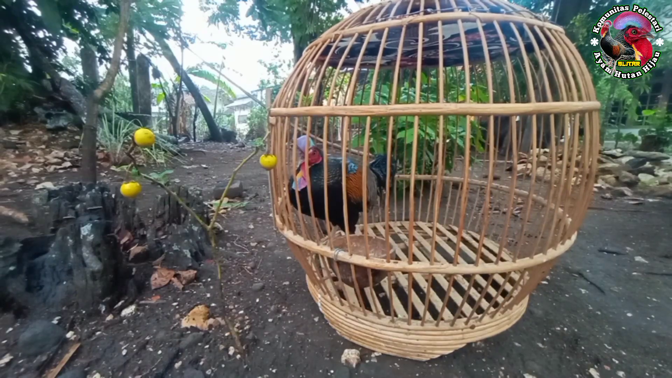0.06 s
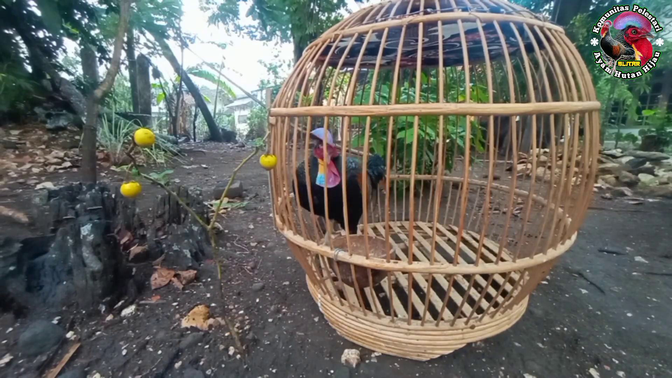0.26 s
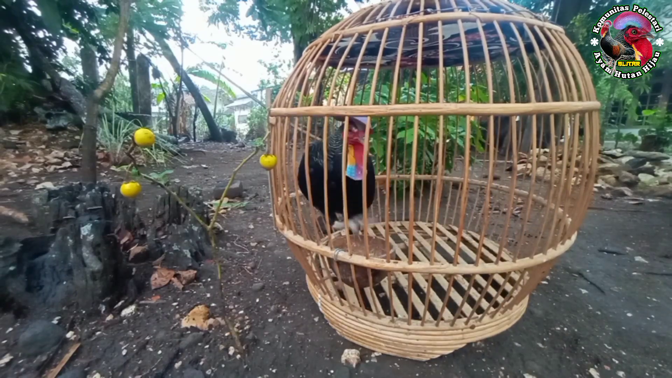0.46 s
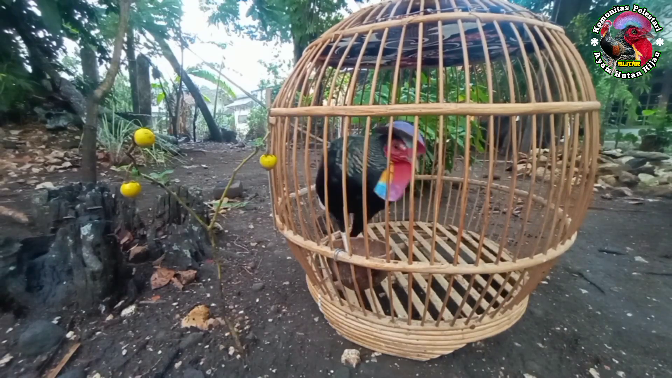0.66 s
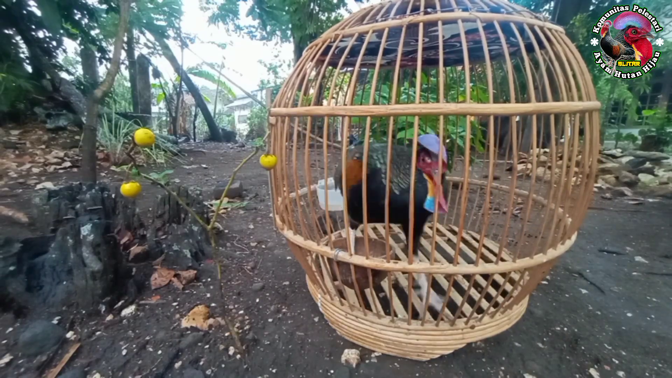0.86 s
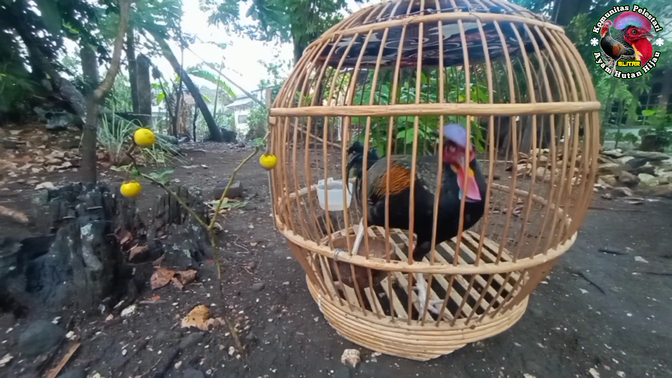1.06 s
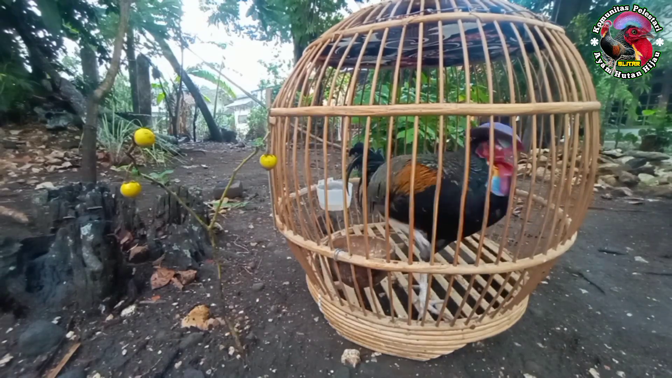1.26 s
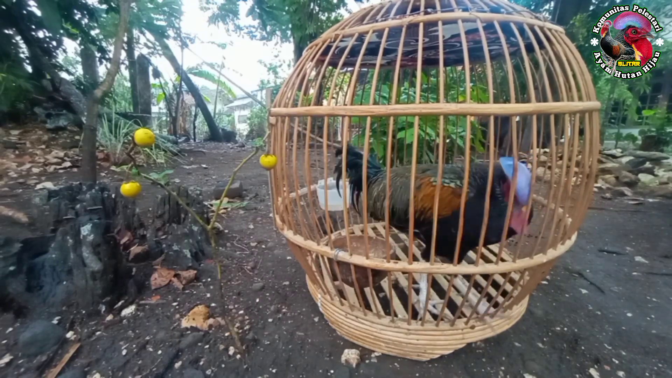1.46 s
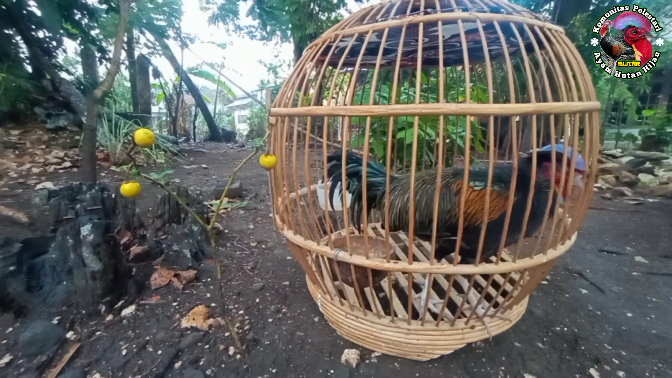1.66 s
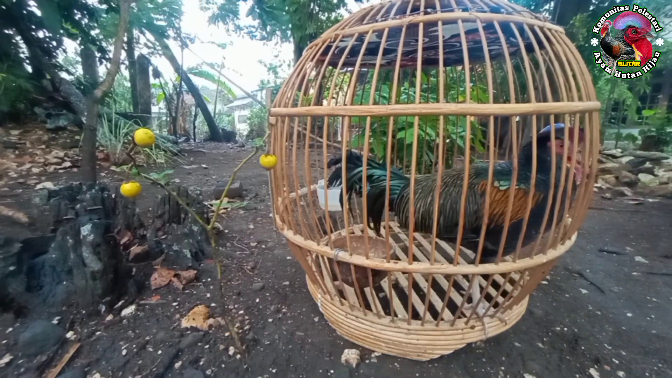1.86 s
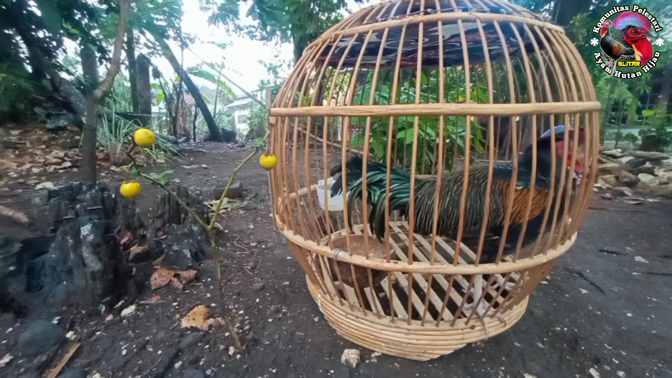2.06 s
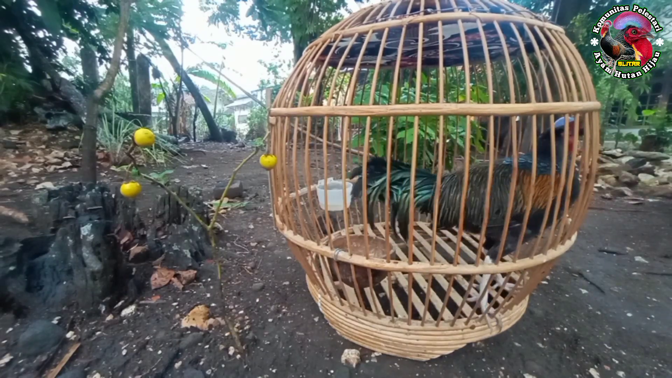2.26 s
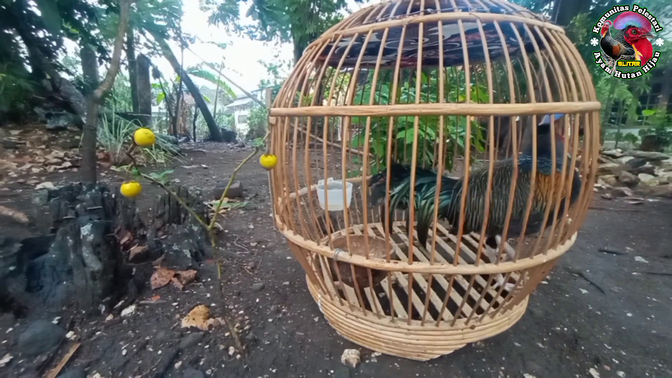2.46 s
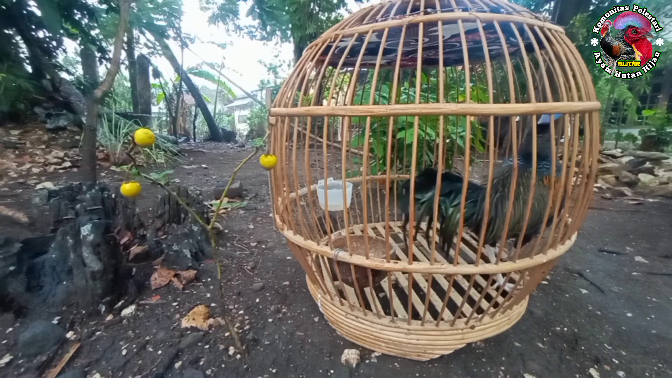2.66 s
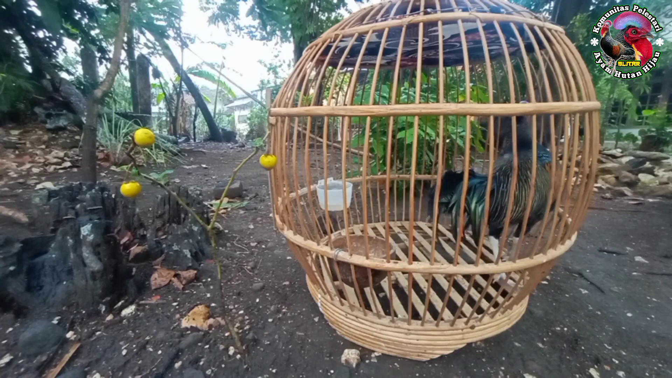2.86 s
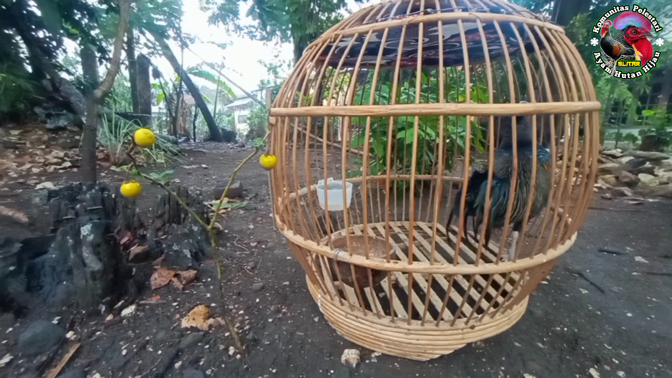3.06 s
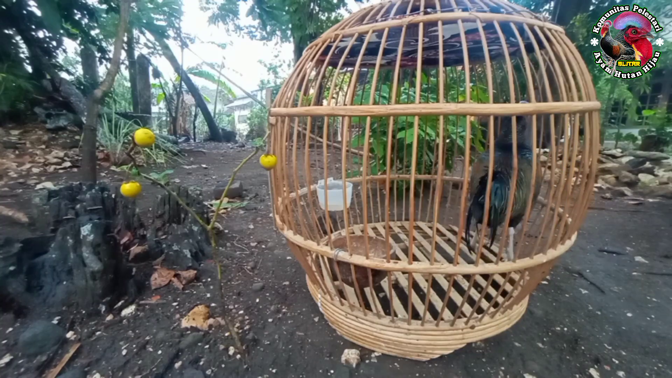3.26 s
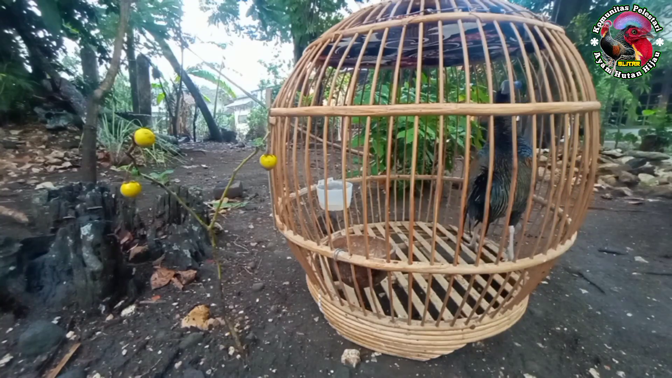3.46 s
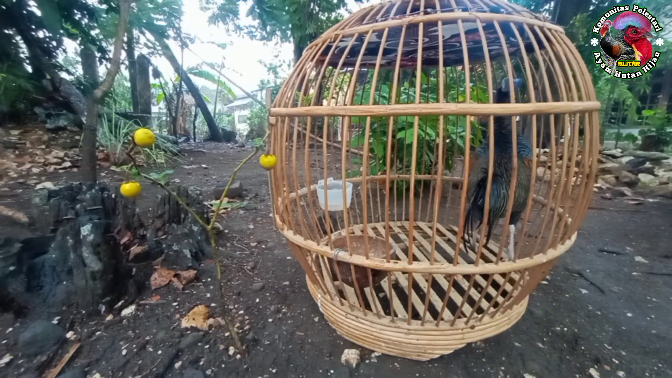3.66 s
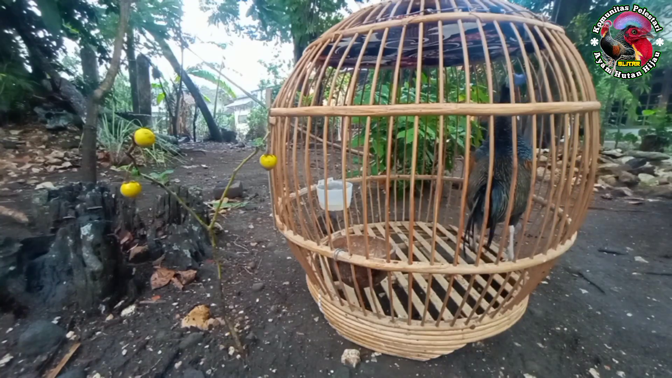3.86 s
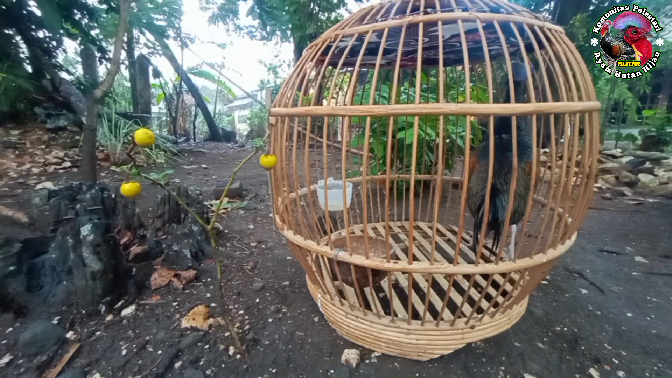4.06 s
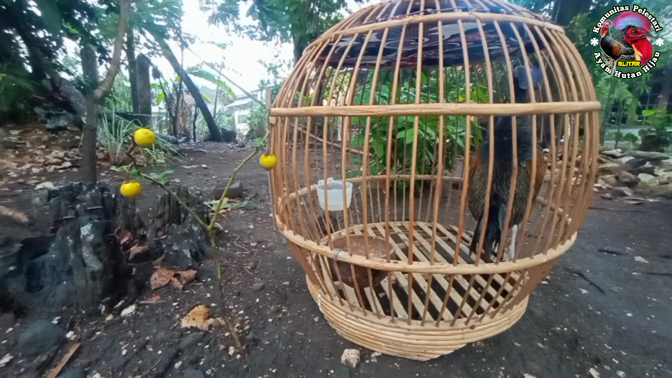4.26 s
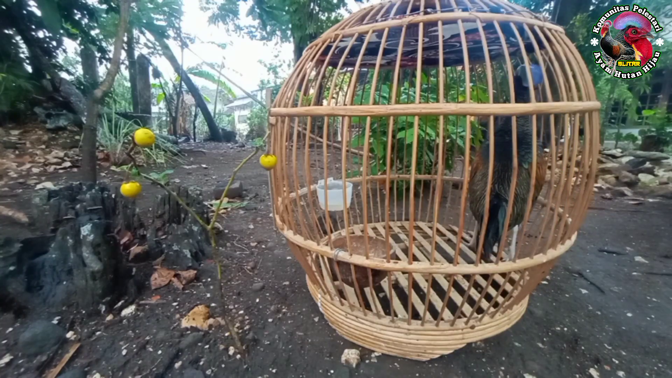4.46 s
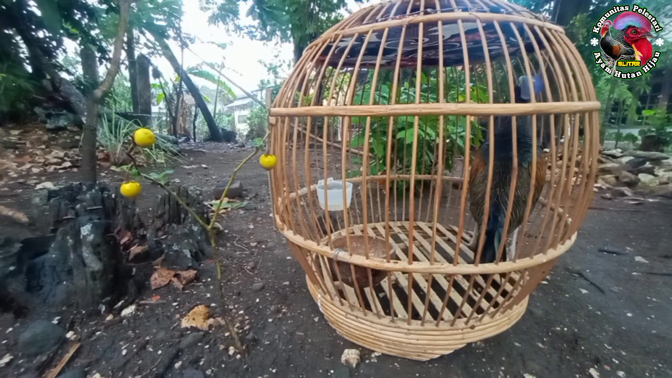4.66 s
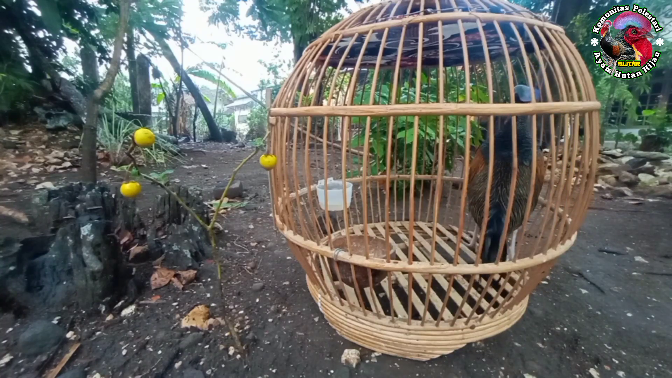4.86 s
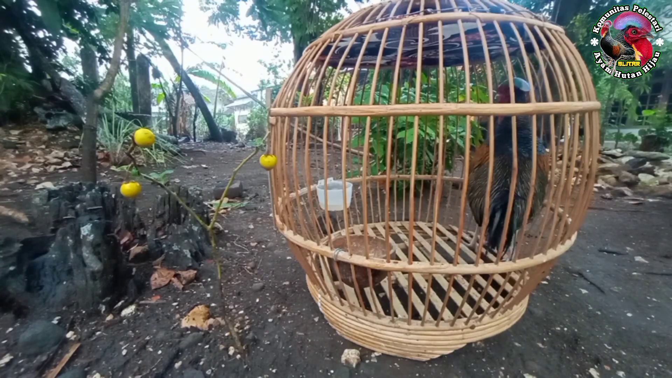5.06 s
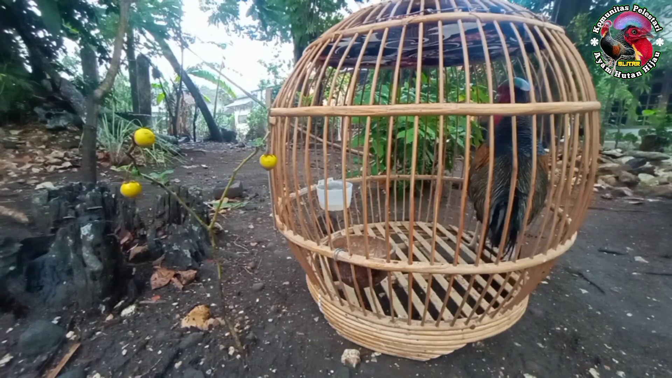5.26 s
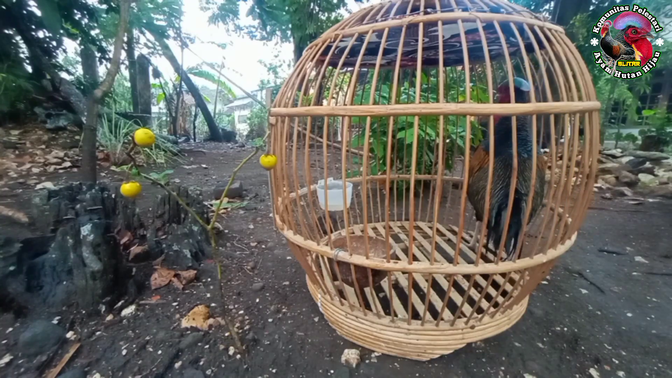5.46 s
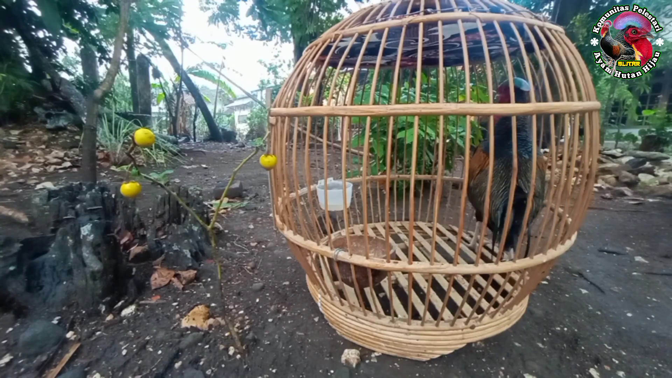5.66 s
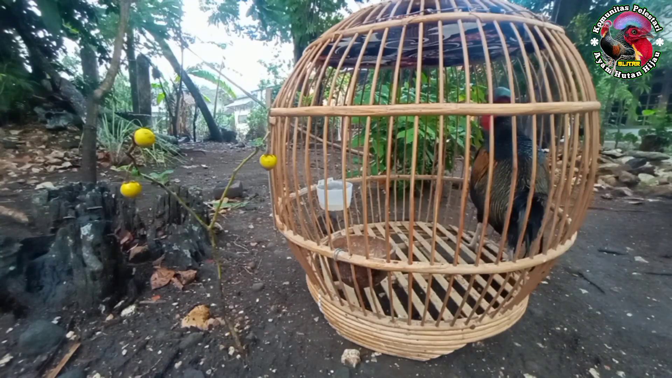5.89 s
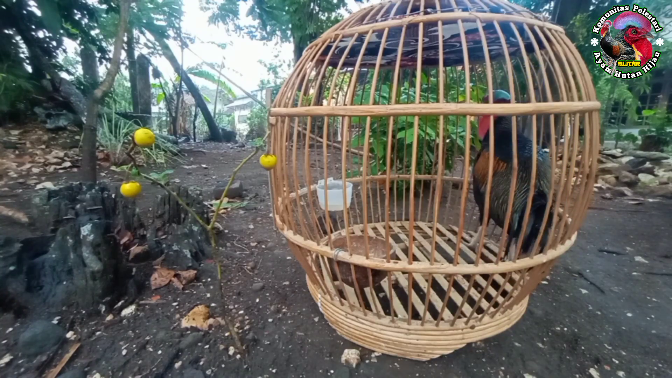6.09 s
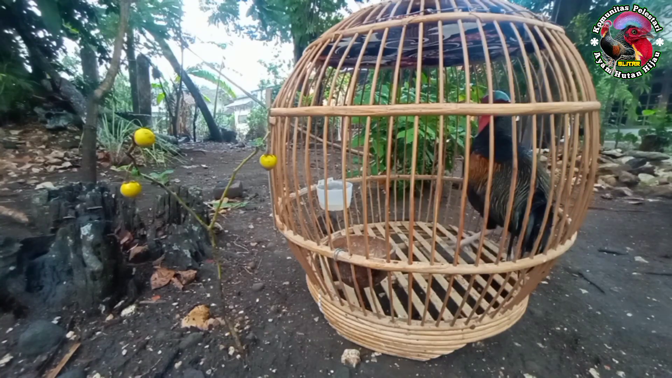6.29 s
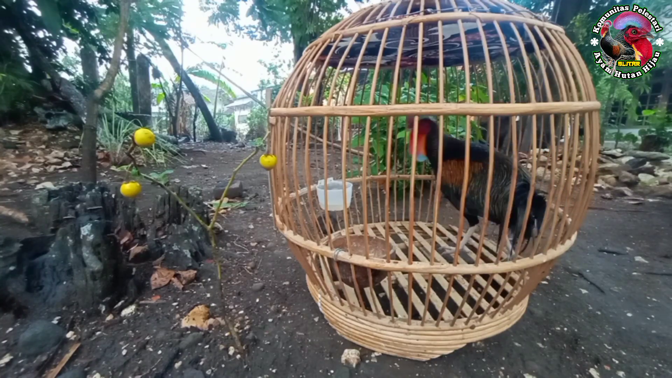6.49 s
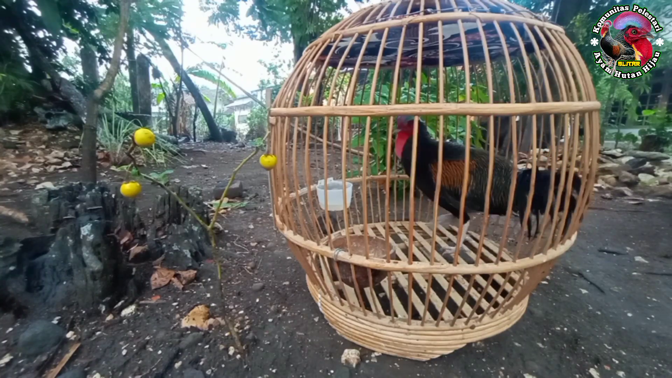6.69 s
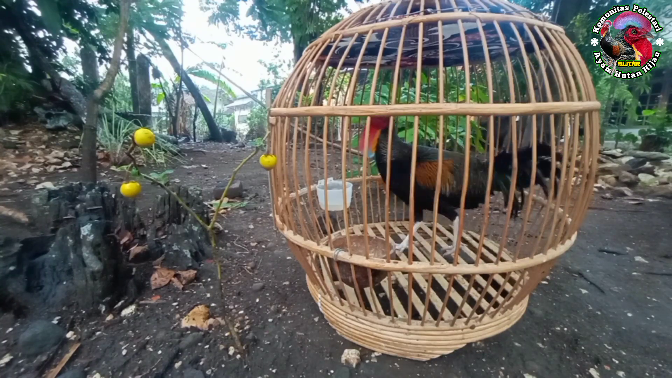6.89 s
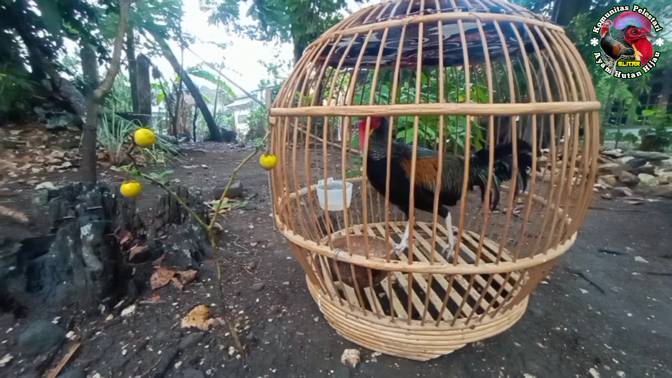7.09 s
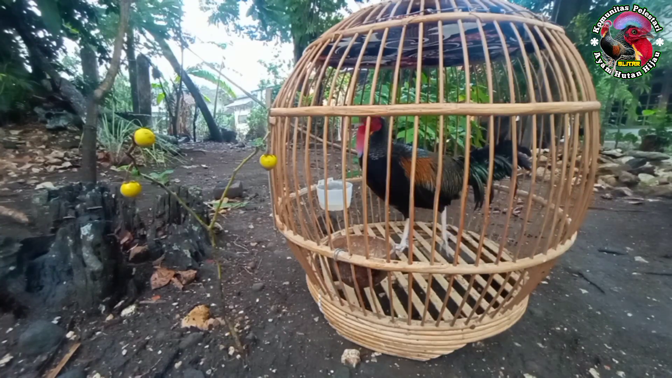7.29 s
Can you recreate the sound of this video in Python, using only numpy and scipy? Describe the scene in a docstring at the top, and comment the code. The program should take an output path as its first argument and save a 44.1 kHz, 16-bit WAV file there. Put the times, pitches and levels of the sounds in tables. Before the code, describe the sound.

Dry claw clicks on a wooden cage floor, a single piercing, raspy rooster-like crow around four seconds, then quiet outdoor air and a few more ticks.

```python
"""In a rattan cage among trees, a junglefowl cock paces, claws ticking on the slats, then crows once in four
syllables. The crow is harmonic pulses with breath noise, shaped by throat and beak; each step is a burst of
clicks ringing the slats. Far cocks and small birds are gliding sines, partly scattered by the trees; stirring
air and leaves are filtered noise. A faint tone and hiss lie underneath. The microphone housing rings near 1.25
kHz and a limiter holds the peaks."""
import sys
import numpy as np
from scipy import signal
from scipy.fft import rfft, irfft
from scipy.io import wavfile
from scipy.ndimage import uniform_filter1d, minimum_filter1d

SR = 44100
rng = np.random.default_rng(int(sys.argv[2]) if len(sys.argv) > 2 else 0)


def wav_record(signal):
    """Record a signal, one row per channel, as 16-bit PCM in the file named by sys.argv[1]."""
    frames = np.transpose(np.atleast_2d(signal))
    bounded = np.clip(frames, -1, 1)
    # unit amplitude maps onto the largest positive 16-bit level
    quanta = np.round(bounded * 32767).astype(np.int16)
    wavfile.write(sys.argv[1], SR, quanta)


N = 323253

# The crow, one table a syllable, from full voice to the start of the release:
# (time [s], pitch before quaver and warble [Hz], level before the throat [dB], roughness [0-1])
CROW_SYLLABLES = [
    [(4.026, 1423, -19.5, 0.58), (4.031, 1364, -12, 0.74), (4.044, 1309, -12.5, 0.72),
     (4.056, 1247, -12.5, 0.65), (4.058, 913, -16, 0), (4.072, 737, -23.5, 0.14), (4.09, 640, -27, 0.1),
     (4.115, 723, -29.5, 0), (4.14, 750, -46, .4)],
    [(4.154, 711, -16.5, 0.09), (4.166, 673.5, -14.5, .1), (4.178, 864, -24, .2)],
    [(4.19, 900.4, -13, .7), (4.207, 942, -13, .8), (4.212, 913.5, -11.5, .05), (4.222, 878, -10.5, .05),
     (4.235, 937, -12.5, 0.2), (4.254, 820, -14, 0.02), (4.263, 870, -14.5, 0.08), (4.269, 980, -19, 0.2)],
    [(4.356, 772, -12, 0.27), (4.365, 829, -13, 0.01), (4.385, 895, -10.5, 0.01), (4.435, 919.7, -11, 0.11),
     (4.468, 1015, -11.5, 0.24), (4.47, 1236, -13.5, 0.65), (4.64, 1261, -11, 0.41),
     (4.665, 1310, -13.5, 0.76), (4.69, 1350, -11, .5), (4.707, 1276, -11.5, 0.69),
     (4.716, 1332, -12.5, 0.12), (4.732, 1256, -11.5, 0.09), (4.745, 1182, -15, 0.25),
     (4.752, 984, -18.5, 0.3), (4.755, 801, -28, 0.2), (4.77, 614, -28, 0)],
]
# A cluck just before the crow, beak shut: (time [s], pitch [Hz], level before the throat [dB], roughness [0-1])
CLUCK_NOTE = [(3.98, 911, -30.5, 0.79), (3.985, 891, -36.5, 0.68)]
SHUT_BEAK_HZ = 1500
# The other side of the syrinx, whistling into the first attack: (time [s], pitch [Hz], level before the throat [dB])
SYRINX_WHISTLE = [(4.02, 2950, -44), (4.025, 2994, -9.5), (4.035, 3047, -17), (4.042, 2880, -45.5)]
COUPLING = 7.4   # how strongly the two sides beat against each other
# Throat and beak resonances: (frequency [Hz], gain [dB])
THROAT_AND_BEAK = [(500, -40.5), (750, -6.5), (950, -3.5), (1250, -4), (1480, -14.5), (1750, -4),
                   (2250, -11), (2520, -6.5), (2750, 2), (3150, 2), (3900, 0.5), (4400, -5.5), (5400, 4),
                   (6500, -9), (7600, -5), (8800, -11), (10000, -7), (13000, -24.5), (15000, -21.5)]
# On the rise to the long note a quaver sets in and deepens
QUAVER_HZ, QUAVER_FROM_S, QUAVER_TO_S, QUAVER_DEPTH_HZ = 50.6, 4.395, 4.47, 44.2
# In the long note the pitch creeps up, then a higher register takes over for a moment, again and again
WARBLE_HZ, WARBLE_FROM_S, WARBLE_TO_S, WARBLE_CREEP_HZ = 39.87, 4.483, 4.657, 130
UNEVEN = .07   # wander of the warble [cycles]


def crow():
    """A muffled cluck, four syllables and a whistle from the second side of the syrinx, through throat and beak."""
    t = np.arange(N) / SR
    turn = (t - WARBLE_FROM_S) * WARBLE_HZ + UNEVEN * drift(5.8)
    warbling = (t > WARBLE_FROM_S) * (t < WARBLE_TO_S)
    high_share = warbling * np.interp(turn % 1, [0, .25, .38, .68, .8, 1], [.1, .1, 1, 1, .1, .1])
    creep_hz = WARBLE_CREEP_HZ * warbling * np.sin(np.pi * turn) ** 2
    deepening = np.interp(t, [QUAVER_FROM_S, QUAVER_TO_S], [0, 1]) ** .5 * (t < QUAVER_TO_S)
    quaver = np.sin(np.pi * QUAVER_HZ * (t - QUAVER_FROM_S - .005)) ** 2
    bend_hz = creep_hz + QUAVER_DEPTH_HZ * deepening * quaver

    shut_beak = signal.butter(3, SHUT_BEAK_HZ, fs=SR, output="sos")
    song = signal.sosfilt(shut_beak, 1e-12 + voice(CLUCK_NOTE, bend_hz, high_share))
    for syllable in CROW_SYLLABLES:
        song = song + voice(syllable, bend_hz, high_share)

    hz, level_db = in_time(SYRINX_WHISTLE)
    sounding = (t > SYRINX_WHISTLE[0][0]) * (t < SYRINX_WHISTLE[-1][0])
    phase = 2 * np.pi * np.cumsum(hz * (1 + 0.024 * drift(200))) / SR
    whistle = from_db(level_db) * sounding * np.sin(phase)
    return colour(song + whistle * (1 + COUPLING * song), THROAT_AND_BEAK)


ATTACK_S, RELEASE_S, SILENT_DB = .005, 0.0054, -34.5   # ramps at either end; SILENT_DB is relative
FULL_VOICE_DB, BRIGHT_HZ, DULLING = -11, 5730, 0.19   # a softer voice has a lower harmonic reach
LEAP_HZ = 307.6   # the high register lies about this far above the low one


def voice(rows, bend_hz, high_share):
    """Membrane pulses as harmonics; roughness shakes pitch and level and adds breath noise gated each cycle."""
    first, last = np.array(rows[0]), np.array(rows[-1])
    rows = [first + [-ATTACK_S, 0, SILENT_DB, 0], *rows, last + [RELEASE_S, 0, SILENT_DB, 0]]
    start, end = int(rows[0][0] * SR), int(rows[-1][0] * SR)
    size = end - start
    hz, level_db, rough = in_time(rows, start, end)
    rough, share = np.clip(rough, 0, 1), high_share[start:end]

    shake = 1 + .065 * rough * drift(250, size)
    reach_hz = BRIGHT_HZ * from_db(DULLING * (level_db - FULL_VOICE_DB))
    low, phase = stack((hz + bend_hz[start:end]) * shake, reach_hz, fundamental=0.98)
    high_hz = hz + LEAP_HZ * (1 + .15 * drift(30, size))
    high, _ = stack(high_hz * shake, reach_hz, fundamental=0.37)
    pulses = (1 - .9 * share) * low + 1.24 * share * high

    halves = 1 + 0.36 * rough * np.cos(phase / 2)   # strong and weak pulses in turn
    rasp = 1 + .55 * rough * drift(600, size)   # pulse strength varies at random
    air = signal.lfilter([1, -.6], [1], rng.standard_normal(size))   # brighter than white
    breath = air * (1 + np.cos(phase)) * (0.047 + 0.23 * rough)
    gain = from_db(level_db + 3.0 * rough * drift(140, size))
    return np.pad(gain * (pulses * halves * rasp + breath), (start, N - end))


CUTOFF_HZ = 15800   # top of the harmonics and of the microphone
FAINT = 0.14   # share of each harmonic that remains beyond the reach


def stack(hz, reach_hz, fundamental):
    """Pulses as up to 20 harmonics, fainter beyond their reach; also returns the phase."""
    phase = 2 * np.pi * np.cumsum(hz) / SR
    pulses = 0
    for k in range(1, 21):
        strength = k ** -.3 * (FAINT + 1 / (1 + (k * hz / reach_hz) ** 6))
        pulses = pulses + np.cos(k * phase) * strength * (k * hz < CUTOFF_HZ)
    return (pulses - (1 - fundamental) * np.cos(phase)) / 2, phase


# Claws on the slats: (time [s], peak level [dB], brightest frequency [Hz], scrape decay [s])
CLAW_STEPS = [(0.202, -54.5, 3800, 0.0056), (0.423, -39, 7400, 0.005), (0.5079, -29.5, 3460, 0.0064),
              (0.529, -33.5, 3620, .011), (0.579, -46, 4470, 0.005), (0.6, -45.5, 4900, 0.0066),
              (0.658, -47, 3730, 0.0059), (0.6888, -26, 6800, 0.008), (0.771, -46.5, 6000, .004),
              (0.792, -45, 8000, .0015), (0.796, -45.5, 5030, 0.016), (1.054, -48, 5200, 0.0066),
              (1.098, -37, 8100, 0.0017), (1.108, -48, 6840, 0.012), (1.152, -39, 2420, 0.013),
              (1.165, -37.5, 5600, 0.0056), (1.4173, -45, 4570, 0.0016), (1.891, -51, 4100, 0.021),
              (1.882, -50, 7500, .004), (1.94, -47, 5050, 0.025), (1.961, -33.5, 2900, 0.01),
              (2.305, -44, 3150, 0.012), (2.372, -49, 5900, 0.0029), (2.484, -45, 2500, 0.014),
              (2.538, -49.5, 6450, 0.013), (2.853, -45, 7640, 0.0092), (3.065, -40.5, 4700, 0.0086),
              (3.097, -48.5, 6800, .005), (3.183, -46.5, 3560, 0.0043), (3.471, -51, 8050, 0.0049),
              (6.116, -40.5, 4950, 0.0057), (6.2344, -43.5, 6650, 0.0053), (6.256, -41.5, 6050, 0.0044),
              (6.313, -49, 7180, 0.0046), (6.536, -31, 5900, 0.0031), (6.715, -42, 5500, 0.0079),
              (6.851, -45, 7080, 0.0047), (7.177, -56, 9490, .003), (7.202, -51, 4600, 0.009),
              (7.312, -54.5, 4450, 0.0059)]
# Slat modes before each touch detunes and reweights them: (frequency [Hz], level [dB])
SLAT_MODES = [(2480, -12), (3800, -6.5), (4950, 1.5), (5900, 2), (6800, 5.5), (8300, 0.5), (10100, 4.5),
              (12500, -25), (14800, -20)]
# The bird's weight coming down on the floor: (time [s], peak level [dB])
FLOOR_THUDS = [(0.806, -48), (1.114, -52), (1.168, -51), (1.883, -45), (1.959, -47.5)]
THUD_S = 0.019   # how long the foot takes to settle


def steps():
    """Scrapes of clicks ring the slats, loudest near each brightest pitch; the floor knocks under weight."""
    out = np.zeros(N)
    for s, peak_db, bright_hz, length in CLAW_STEPS:
        slips = scrape(length)
        strengths_db = rng.normal(0, 4, len(SLAT_MODES))
        tick = 0.06 * np.diff(slips, 2, prepend=[0, 0])   # the bare click
        for (hz, mode_db), own_db in zip(SLAT_MODES, strengths_db):
            off_pitch_db = 20.0 * abs(np.log2(hz / bright_hz))
            mode = ring(slips, hz * from_db(0.068 * own_db), 35 / hz)   # T60 of about 35 cycles
            tick += mode * from_db(mode_db + own_db - off_pitch_db)
        # small contacts have little bass
        thin = signal.butter(2, 0.2 * bright_hz, "high", fs=SR, output="sos")
        add(out, s, peak_db, signal.sosfilt(thin, tick))
    for s, peak_db in FLOOR_THUDS:
        push = np.diff(scrape(THUD_S), prepend=0)
        add(out, s, peak_db, ring(push, 580, 0.016) + ring(push, 720, 0.0038))
    return out


def scrape(length):
    """Random slips of a claw that lands with one firm click, then drags and dies away."""
    span, length = np.arange(2600) / SR, max(length, .001)
    slips = rng.laplace(size=len(span)) * (rng.random(len(span)) < .2)
    slips *= (1 - np.exp(-span / (0.21 * length))) * np.exp(-span / length)
    slips[60] += 2.2
    return slips


def rustle():
    """Feathers and litter crackle faintly for a while after each step: random grains of noise."""
    table = np.array(CLAW_STEPS)
    stir = np.zeros(N)
    stir[(table[:, 0] * SR).astype(int)] = from_db(.5 * table[:, 1])
    stir = signal.lfilter([1], [1, -np.exp(-1 / (.14 * SR))], stir)   # dies away over 0.14 s
    ticks = (rng.random(N) < 35 / SR) * from_db(3 * rng.standard_normal(N))   # about 35 a second
    grains = stir * signal.lfilter([1], [1, -.993], ticks) * rng.standard_normal(N)
    band = signal.butter(2, [3000, 10000], "band", fs=SR, output="sos")
    return from_db(-53.0) * signal.sosfilt(band, grains)


# Far cocks, notes of the fundamental:
# (time [s], length [s], first pitch [Hz], last pitch [Hz], level before flutter [dB])
FAR_COCK_NOTES = [(1.45, 0.16, 970, 972, -67.5), (1.63, 0.24, 1006, 1062, -68.5),
                  (1.87, 0.21, 1246, 1297, -67), (2.12, 0.23, 1320, 1376, -71.5),
                  (2.36, 0.3, 1323, 1273, -73.5), (2.43, 0.082, 1047, 1037, -66.5),
                  (2.63, 0.12, 991, 980, -70.5), (3.17, 0.13, 1158, 1185, -73),
                  (2.65, 0.49, 1147, 1135, -83), (5.98, 0.19, 1253, 1240, -78),
                  (6.4, 0.48, 1267, 1278, -74.5)]


def far_cocks():
    """Distant crowing, reduced to its fundamental."""
    return notes(FAR_COCK_NOTES, waver=0.0081, flutter_db=3.5)


# Small birds: (time [s], length [s], first pitch [Hz], last pitch [Hz], level before flutter [dB])
BIRD_WHISTLES = [(0.099, 0.055, 3760, 3500, -70), (0.415, 0.05, 3660, 3440, -69),
                 (2.552, 0.18, 6330, 5940, -74), (2.83, 0.15, 7500, 7550, -77),
                 (2.898, 0.099, 2440, 2600, -71.5), (3.086, 0.17, 3710, 3475, -67.5),
                 (3.108, 0.13, 6480, 6600, -68.5), (3.282, 0.15, 3670, 3580, -68.5),
                 (3.35, 0.14, 7670, 7350, -72.5), (3.61, 0.22, 6540, 6480, -77),
                 (3.88, .12, 7740, 7700, -79), (5.443, 0.067, 3693, 3560, -75),
                 (5.64, 0.036, 3320, 4750, -77), (5.68, 0.068, 3704, 3616, -82),
                 (6.52, 0.07, 3730, 3550, -62.5), (7.03, .12, 3755, 3596, -80)]


def whistles():
    """Clear whistles of small birds, nearly steady gliding sines."""
    return notes(BIRD_WHISTLES, waver=0.0066, flutter_db=3.5)


# Harsh calls of far birds:
# (time [s], length [s], first pitch [Hz], last pitch [Hz], level before flutter and mix [dB])
HARSH_CALLS = [(2.21, 0.14, 3920, 3450, -68), (3.55, 0.082, 4310, 3600, -66.5),
               (5.76, 0.23, 4300, 3823, -74), (6.51, 0.099, 4400, 4310, -62),
               (6.68, 0.089, 4535, 4040, -59.5), (7.0, 0.33, 4610, 4300, -77)]


def squawks():
    """Harsh calls: a fast, wide pitch waver smears each sine into a rasp."""
    return notes(HARSH_CALLS, waver=.09, flutter_db=4, rate_hz=250)


CHATTER_DB, CHATTER_SWING_DB = -82.5, 4.5   # before the mix


def chatter(count):
    """Many small birds, coming and going: short slides up or down at random moments and pitches."""
    s, length, pitch, slide, loud = rng.random((count, 5)).T
    hz = 3200 * 1.6 ** pitch
    last_hz = hz * (1 + .3 * (slide - .6))
    table = zip(s * (N / SR - .2), .03 + .09 * length, hz, last_hz, 9 * loud)
    flock = rms_one(notes(table, waver=.025, flutter_db=4, rate_hz=120))
    return from_db(CHATTER_DB + CHATTER_SWING_DB * drift(1.5)) * flock


def notes(table, waver, flutter_db, rate_hz=50):
    """Gliding, unsteady sines; distance leaves only the strongest partial."""
    out = np.zeros(N)
    for s, length, first_hz, last_hz, level_db in table:
        start, n = int(s * SR), int(length * SR)
        hz = np.linspace(first_hz, last_hz, n) * (1 + waver * drift(rate_hz, n))
        gain = from_db(level_db + flutter_db * drift(41, n)) * signal.windows.tukey(n, .4)
        out[start:start + n] += gain * np.sin(2 * np.pi * np.cumsum(hz) / SR)
    return out


# Decay of the scattered sound: (frequency [Hz], T60 [s])
TREE_DECAY = [(500, .75), (5000, .72), (8000, .6), (12000, .45)]


def trees(x):
    """Trunks and leaves scatter a diffuse tail that dies band by band."""
    t, tail = np.arange(SR) / SR, 0
    table_hz, table_t60 = np.transpose(TREE_DECAY)
    edges = 300 * 2 ** np.arange(0, 6.1, 1.0)   # octaves
    for low, high in zip(edges, edges[1:]):
        t60 = np.interp(np.log(np.sqrt(low * high)), np.log(table_hz), table_t60)
        octave = signal.butter(2, [low, high], "band", fs=SR, output="sos")
        tail = tail + signal.sosfilt(octave, rng.standard_normal(SR)) * from_db(-60 * t / t60)
    tail *= (1 - np.exp(-t / 0.0035)) * np.exp(-(t / 0.63) ** 4)   # builds up; ends at the farthest trees
    return signal.fftconvolve(x, tail / np.sqrt(np.sum(tail ** 2)))[:N]


# How strongly the air stirs: (time [s], rumble level before its swells [dB])
AIR_STIR = [(0, -79.5), (.55, -68.5), (1.0, -71.5), (1.6, -70), (2.1, -72.5), (2.65, -66.5), (3.0, -74),
            (3.3, -67.5), (3.9, -75.5), (4.9, -73), (5.05, -61), (5.25, -76), (6.3, -72), (6.7, -67.5),
            (7.33, -74)]
# Tone of the rumble: (frequency [Hz], relative level per Hz [dB])
RUMBLE_TONE = [(30, -35), (60, -14), (100, -4.5), (200, -7), (400, -12), (700, -13.5), (1000, -41.5)]
# Tone of the leaves: (frequency [Hz], relative level per Hz [dB])
LEAF_TONE = [(300, -49), (700, -12.5), (1200, -11), (1600, -16.5), (2500, -19), (4200, -23.5), (5500, -20),
             (7000, -37)]
LEAVES_DB = -5   # leaves against rumble


def moving_air():
    """Stirring air rumbles low and the leaves follow its level."""
    rumble_db, = in_time(AIR_STIR)
    rumble = lumps(RUMBLE_TONE, rumble_db, 25, 2.7, count=11)
    return rumble + lumps(LEAF_TONE, rumble_db + LEAVES_DB, 300, 2.0, count=10)


def lumps(spectrum, level_db, low_hz, patchy_db, count):
    """Noise in lumps: each half octave swells partly on its own, partly with the others."""
    noise = colour(rng.standard_normal(N), spectrum)
    edges = low_hz * 2 ** (np.arange(count + 1) / 2)
    gust, total = drift(7.3), 0
    for low, high in zip(edges, edges[1:]):
        band = signal.sosfilt(signal.butter(2, [low, high], "band", fs=SR, output="sos"), noise)
        total = total + band * from_db(patchy_db * (drift(5.3) + 0.94 * gust))
    return from_db(level_db) * rms_one(total)


HUM_HZ, HUM_WIDTH_HZ, HUM_DB = 1272, 45, -88


def hum():
    """A faint narrow tone wavers throughout: noise twice through one resonance, swelling slowly."""
    t60 = np.log(1000) / (np.pi * HUM_WIDTH_HZ)
    tone = ring(ring(rng.standard_normal(N), HUM_HZ, t60), HUM_HZ, t60)
    return from_db(HUM_DB + 3.0 * drift(3.0)) * rms_one(tone)


# Tone of the microphone noise: (frequency [Hz], relative level per Hz [dB])
HISS_TONE = [(3000, 1), (9000, -4), (15000, -4)]
HISS_DB = -91.5


def hiss():
    """Steady microphone noise."""
    return from_db(HISS_DB) * rms_one(colour(rng.standard_normal(N), HISS_TONE))


def from_db(db):
    """Gain of a level in dB."""
    return 10 ** (np.asarray(db) / 20)


def rms_one(x):
    """Scales to unit rms."""
    return x / np.sqrt(np.mean(x ** 2) + 1e-20)


def in_time(rows, n0=0, n1=N):
    """Columns of a table after the time, interpolated sample by sample."""
    s, *columns = np.transpose(rows)
    return [np.interp(np.arange(n0, n1) / SR, s, c) for c in columns]


def drift(rate_hz, size=N):
    """Random wander of unit rms: noise through two one-pole low-passes."""
    r = np.exp(-2 * np.pi * rate_hz / SR)
    settled = signal.lfilter([1], [1, -2 * r, r * r], rng.standard_normal(size + 3000))[3000:]
    return rms_one(settled)


def colour(x, points):
    """Causal minimum-phase filter through the given (frequency [Hz], gain [dB]) points."""
    hz = np.maximum(np.arange(4097) * SR / 8192, 10)
    points_hz, points_db = np.transpose(points)
    gain_db = np.interp(np.log(hz), np.log(points_hz), points_db)
    cepstrum = irfft(gain_db * np.log(10) / 20)
    cepstrum[1:4096] *= 2   # fold to the causal half
    cepstrum[4097:] = 0
    return signal.fftconvolve(x, irfft(np.exp(rfft(cepstrum)))[:4096])[:len(x)]


def ring(x, hz, t60):
    """A resonance: a unit click sets a decaying sine of initial height 1 ringing."""
    r, w = from_db(-60 / (t60 * SR)), 2 * np.pi * hz / SR
    return signal.lfilter([0, np.sin(w)], [1, -2 * r * np.cos(w), r * r], x + 1e-18)


def add(out, s, peak_db, sound):
    """Mixes a short sound in at its time and peak level."""
    n = int(s * SR)
    out[n:n + len(sound)] += (from_db(peak_db) * sound / np.abs(sound).max())[:N - n]


TREES_DB = -11   # the crow's share sent to the trees


def scene():
    """Near bird with a little scattering, far birds with somewhat more, over air, hum and hiss."""
    cock, feet = crow(), steps() + rustle()
    far = far_cocks() + whistles()
    birds = chatter(count=220) + squawks()
    near_send = from_db(TREES_DB) * cock + from_db(-22.0) * feet
    wet = trees(near_send + from_db(-7.0) * far + from_db(-10.5) * birds)
    direct = cock + feet + far + from_db(-2.0) * birds
    return (direct + wet + moving_air() + hum() + hiss())[None]


HOUSING_HZ, HOUSING_WIDTH_HZ, HOUSING_DB = 1231, 110, 13.5   # resonance added to the whole mix
LIMIT, LIMITER_S = .6, .004   # peaks are held near this height, by a gain that moves this fast


def record(dry):
    """The housing adds its resonance, a limiter holds the peaks, the top is cut."""
    r = np.exp(-np.pi * HOUSING_WIDTH_HZ / SR)
    poles = [1, -2 * r * np.cos(2 * np.pi * HOUSING_HZ / SR), r * r]
    resonance = signal.lfilter([(1 - r * r) / 2, 0, (r * r - 1) / 2], poles, dry)
    boxed = dry + from_db(HOUSING_DB) * resonance
    span = int(LIMITER_S * SR)
    needed_gain = LIMIT / np.maximum(np.abs(boxed), LIMIT)
    limited = boxed * uniform_filter1d(minimum_filter1d(needed_gain, span), span)
    return signal.sosfilt(signal.cheby2(18, 60, CUTOFF_HZ, fs=SR, output="sos"), limited)


dry = scene()
out = record(dry)
wav_record(out)
```